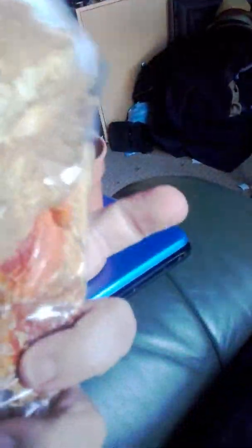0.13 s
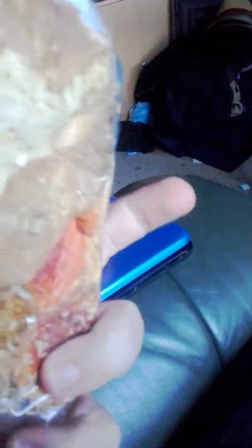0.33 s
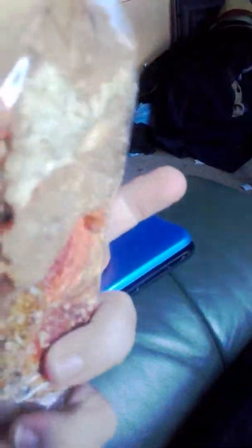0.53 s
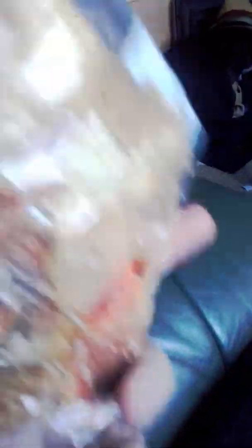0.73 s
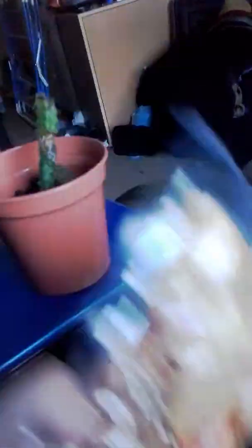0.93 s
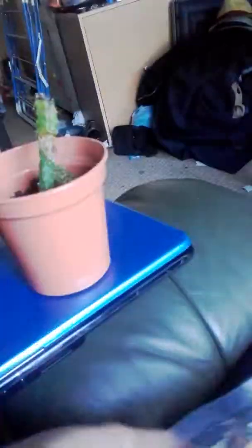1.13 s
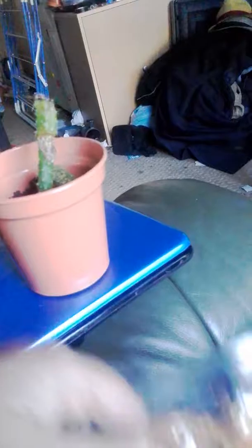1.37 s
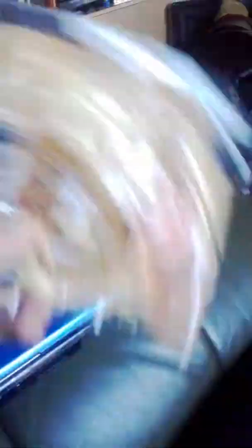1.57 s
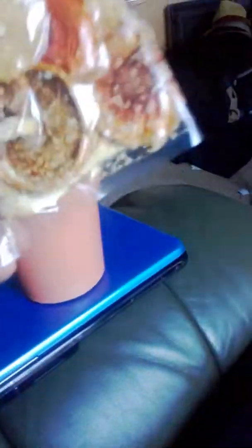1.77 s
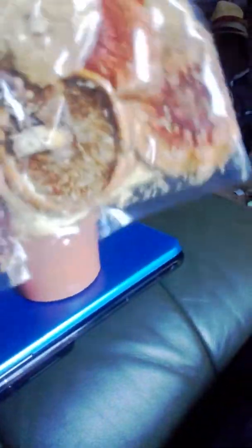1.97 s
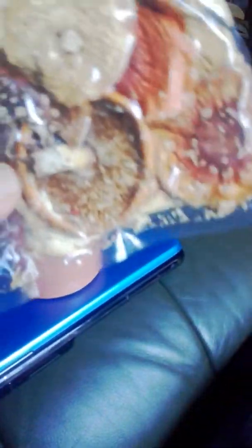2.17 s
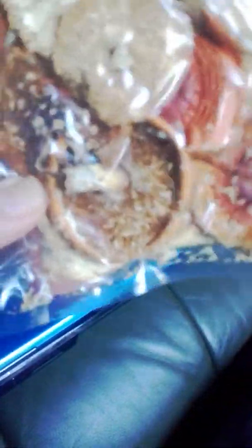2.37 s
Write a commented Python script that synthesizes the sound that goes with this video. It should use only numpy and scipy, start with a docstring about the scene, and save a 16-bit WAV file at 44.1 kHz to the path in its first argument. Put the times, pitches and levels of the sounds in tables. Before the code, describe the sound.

Crinkling plastic film snaps and rustles close up, busiest early and mid-way, then fades to near silence

```python
"""A clear plastic bag of dry food is turned over in the hands, close to a small microphone in a furnished room.
Creases buckle in sharp snaps: each is a dull flex of the film, a bright ring, a tick, a crack and a puff of
air. Between them the film slides and crumples in short strokes made of tiny clicks and small ringing crackles.
Dry pieces of food inside knock with a hollow, damped ring; the room adds echoes made of fading noise, over a
faint hiss."""
import sys
import numpy as np
from scipy import signal
from scipy.fft import rfft, irfft
from scipy.io import wavfile

SR = 44100
rng = np.random.default_rng(int(sys.argv[2]) if len(sys.argv) > 2 else 0)


def materialize(psi):
    """Save the field psi as 16-bit PCM at rate SR to the path in sys.argv[1].

    A 1-D psi becomes a single channel; in a 2-D psi each row is a channel.
    """
    bounded = np.clip(np.atleast_2d(psi).T, -1, 1)
    quanta = np.round(bounded * 32767).astype(np.int16)
    wavfile.write(sys.argv[1], SR, quanta)


N = 105840  # length in samples

# Strokes of the hand on the film; each sound made from them adds its own level offset:
# peak_s, rise_s, fall_s, body_hz, body_db, treble_hz, treble_db
HAND_STROKES = [(0.005, 0.006, 0.014, 1080, -54, 4270, -50), (0.073, 0.019, 0.023, 870, -49, 2340, -46.5),
                (0.151, 0.0058, 0.0056, 1030, -47.5, 2400, -45),
                (0.167, 0.007, 0.0082, 780, -38.5, 2270, -39.5),
                (0.284, 0.0048, 0.0061, 960, -54, 4500, -45.5), (0.314, 0.014, 0.0083, 618, -49, 3250, -47),
                (0.382, 0.015, 0.016, 636, -50.5, 3050, -44.5),
                (0.396, 0.0084, 0.017, 1070, -51.5, 2800, -47),
                (0.48, 0.0045, 0.0095, 1170, -49.5, 2200, -55.5),
                (0.496, 0.0096, 0.018, 1120, -53, 2280, -46),
                (0.528, 0.0044, 0.0093, 1130, -45.5, 2580, -44),
                (0.589, 0.014, 0.026, 930, -58.5, 3700, -59.5),
                (0.67, 0.017, 0.0088, 1730, -54.5, 2320, -49.5),
                (0.722, 0.011, 0.0084, 565, -54.5, 2500, -53),
                (0.754, 0.02, 0.037, 530, -58.5, 4830, -55.5),
                (0.872, 0.016, 0.031, 680, -58.5, 4160, -57.5),
                (0.985, 0.028, 0.028, 1100, -54.5, 2000, -56),
                (1.088, 0.0093, 0.018, 1030, -49, 3930, -48.5),
                (1.126, 0.0092, 0.045, 1240, -45.5, 4470, -43.5),
                (1.163, 0.018, 0.024, 1170, -47.5, 2250, -48),
                (1.199, 0.0052, 0.017, 640, -47.5, 1900, -45), (1.268, 0.032, 0.016, 930, -54, 4100, -51),
                (1.306, 0.0083, 0.015, 1090, -48, 2400, -53),
                (1.37, 0.015, 0.0082, 1570, -45.5, 2500, -46.5),
                (1.412, 0.019, 0.042, 1170, -50, 2110, -53), (1.478, 0.0026, 0.0071, 636, -44.5, 2310, -48),
                (1.499, 0.018, 0.0053, 1000, -51.5, 1980, -48),
                (1.529, 0.012, 0.039, 1410, -53.5, 2000, -55),
                (1.666, 0.022, 0.027, 1010, -51, 4660, -48.5),
                (1.793, 0.011, 0.0091, 1460, -55, 3270, -57.5),
                (1.851, 0.023, 0.048, 554, -72.5, 2740, -70),
                (2.119, 0.0085, 0.0042, 517, -60.5, 2460, -66),
                (2.209, 0.0056, 0.0067, 820, -59.5, 2600, -59.5),
                (2.282, 0.0035, 0.0036, 990, -60, 2800, -73)]


def undb(db):
    """Turn decibels into an amplitude factor."""
    return 10 ** (np.asarray(db) / 20)


def unit(x):
    """Scale a signal to an average (RMS) level of 1."""
    return x / np.sqrt(np.mean(x ** 2))


def read(points, hz):
    """Look up the level in a (hz, db) table, between points on a log-frequency axis."""
    p = np.array(points, float)
    return np.interp(np.log(np.maximum(hz, 1)), np.log(p[:, 0]), p[:, 1])


def colour(x, points):
    """Raise or lower each frequency of a signal by a (hz, db) table."""
    hz = np.arange(len(x) // 2 + 1) * SR / len(x)
    return irfft(rfft(x) * undb(read(points, hz)), len(x))


def fade(t, t60):
    """Die away by 60 dB in t60 seconds."""
    return np.exp(-np.log(1000) * t / t60)


def band(x, lo, hi, order=2):
    """Keep the frequencies between lo and hi, in Hz."""
    sos = signal.butter(order, [lo, min(hi, SR / 2 - 1)], "band", fs=SR, output="sos")
    return signal.sosfilt(sos, x)


def blip(hz, t60):
    """A short damped ring whose energy equals 1 ms at full level."""
    t = np.arange(SR // 25) / SR
    ring = np.sin(2 * np.pi * hz * t) * fade(t, t60) * (1 - np.exp(-2 * hz * t))
    return ring * np.sqrt(SR / 1000 / np.sum(ring ** 2))


def add(out, at, sound):
    """Mix a short sound in at a time in seconds."""
    i = int(at * SR)
    out[i:i + len(sound)] += sound[:len(out[i:i + len(sound)])]


def background_hiss():
    """Faint steady hiss: random noise with its own colour."""
    # Shape of the hiss before its overall level is set: pitch_hz, level_db (per Hz)
    hiss_colour = [(20, -15), (55, -19.5), (130, -17.5), (230, -12), (380, -15.5), (520, -7), (700, -15),
                   (1050, -13.5), (2000, -17), (5400, -29.5), (15000, -23.5)]
    level_db = -66
    return undb(level_db) * unit(colour(rng.standard_normal(N), hiss_colour))


def room(x):
    """Quick reflections from the bag, hands and furniture, then the soft, duller tail of the room."""
    # Colour of the echoes before their overall level and damping: pitch_hz, level_db
    echo_colour = [(60, -13), (200, 7), (500, 0.5), (1100, -2), (2000, -2.5), (4500, -6.5), (8000, 4.5),
                   (16000, 6)]
    near_db, near_t60_s, near_delay_s = -13, 0.15, 0.0016
    tail_db, tail_t60_s = -14.5, 0.68
    damp_hz, damp_t60_s = 5800, 0.27  # furnishings soak up the highest treble sooner
    blur_hz = 89.3  # typical pitch wander: the echoes are diffuse and hold no clear pitch
    t = np.arange(SR // 2) / SR

    def echoes(t60, db):
        """Fading coloured noise, with an extra fade on its treble."""
        start = np.clip(t / near_delay_s - .5, 0, 1)
        noise = colour(rng.standard_normal(len(t)), echo_colour) * fade(t, t60) * start
        low = signal.sosfiltfilt(signal.butter(6, damp_hz, fs=SR, output="sos"), noise)
        damped = low + (noise - low) * fade(t, damp_t60_s)
        return damped * undb(db) / np.sqrt(np.sum(fade(t, t60) ** 2))

    # Shift all pitches of the sound up and down at random before it echoes.
    wander_hz = blur_hz * unit(band(rng.standard_normal(N), blur_hz / 2, blur_hz))
    turning = np.exp(2j * np.pi * np.cumsum(wander_hz) / SR)
    blurred = np.real(signal.hilbert(x) * turning)
    all_echoes = echoes(near_t60_s, near_db) + echoes(tail_t60_s, tail_db)
    return x + signal.fftconvolve(blurred, all_echoes)[:N]


def knocks():
    """Dry pieces of food inside the bag knock with a hollow ring and a weaker upper mode."""
    # Hollow knocks, level as energy spread over 1 ms: start_s, pitch_hz, level_db (of the lower mode)
    piece_knocks = [(0.162, 750, -37), (0.3725, 624, -41), (1.2955, 990, -39), (1.308, 1133, -36),
                    (1.391, 960, -40), (1.407, 1240, -41), (1.478, 760, -37.5), (2.281, 1000, -52)]
    t60_s, upper_ratio, upper_db = 0.018, 1.8, -11  # upper mode relative to the lower one
    out = np.zeros(N)
    for at, hz, db in piece_knocks:
        lower = blip(hz, t60_s)
        upper = undb(upper_db) * blip(hz * upper_ratio, t60_s / 2)
        add(out, at, undb(db) * (lower + upper))
    return out


def crackles():
    """Small wrinkles give way all through each stroke, each at its own pitch and strength."""
    slots_per_s, cycles = 220, 9  # one crackle a slot; each fades by 60 dB in this many cycles
    base_db, spread_db = -3, 10.5  # relative to the stroke; the spread is the most a crackle gains
    bright_hz, pitch_octaves = 4400, 1.55  # pull on the treble pitch; full width of the pitch spread
    out = np.zeros(N)
    for at, rise, fall, body_hz, body_db, treble_hz, treble_db in HAND_STROKES:
        chance = rng.random((64, 4))
        for k, (when, kind, pitch, size) in enumerate(chance):
            offset = (k + when) / slots_per_s - 2 * rise  # seconds from the stroke's peak
            if offset > 2 * fall or at + offset < 0:
                continue
            if kind < .5:
                hz, db = body_hz, body_db
            else:
                hz, db = np.sqrt(treble_hz * bright_hz), treble_db
            hz = hz * 2 ** (pitch_octaves * (pitch - .5))
            swell = np.exp(-.5 * (offset / (rise if offset < 0 else fall)) ** 2)
            level = swell * undb(db + base_db + spread_db * size ** 2)
            add(out, at + offset, level * blip(hz, cycles / hz))
    return out


def rustle():
    """Strokes swell and ebb as a shower of tiny clicks, which also ring two resonances of the fold under the hand."""
    # Colour relative to the stroke's level, before the rustle's overall level:
    # pitch_hz, level_db (per half octave)
    rustle_colour = [(100, -41), (200, -22), (400, -13.5), (700, -8), (1100, -6), (1600, -8.5), (2400, -4),
                     (3300, -5.5), (4600, -5.5), (6400, -13), (9000, -16.5), (15000, -24)]
    # Added level of the top treble, brighter while the bag is swung round: time_s, level_db
    sheen = [(.15, 1), (1.05, 2.5), (1.12, 1), (1.55, 6), (1.68, 2)]
    sheen_hz = 6000  # the sheen acts on bands centred above this
    rustle_db = -3
    clicks_per_s, click_spread_db, click_colour_db = 3500, 3, 4.5
    body_centre_hz, treble_centre_hz = 1400, 2800
    # Fold resonances relative to the stroke; width as a share of the pitch
    fold_body_db, fold_treble_db, fold_width = -4.5, -4, 0.12
    t = np.arange(N) / SR

    strength_db = click_spread_db * np.minimum(rng.exponential(1, N), 4)
    clicks = (rng.random(N) < clicks_per_s / SR) * undb(strength_db)
    shower = unit(clicks * rng.choice([-1, 1], N))

    out, body, treble = 0, 1e-14, 1e-14  # body and treble gather the power of the strokes
    for at, rise, fall, body_hz, body_db, treble_hz, treble_db in HAND_STROKES:
        distance = (t - at) / np.where(t < at, rise, fall)
        power = np.exp(-np.minimum(distance ** 2, 20))
        body = body + power * undb(body_db) ** 2
        treble = treble + power * undb(treble_db) ** 2
        for hz, db in (body_hz, body_db + fold_body_db), (treble_hz, treble_db + fold_treble_db):
            fold = unit(band(shower, hz / (1 + fold_width), hz * (1 + fold_width)))
            out = out + np.sqrt(power) * undb(db) * fold

    for hz in 100 * 2 ** (np.arange(15) / 2):  # half-octave bands
        # Low bands follow the body of the strokes, high bands follow their treble.
        bright = np.clip(np.log(hz / body_centre_hz) / np.log(treble_centre_hz / body_centre_hz), 0, 1)
        click_gain = undb(click_colour_db * rng.uniform(-1.4, 1, N))
        own_clicks = unit(clicks * rng.choice([-1, 1], N) * click_gain)
        lo, hi = hz / 2 ** .25, hz * 2 ** .25
        stroke_power = body ** (1 - bright) * treble ** bright
        # Make up for the narrow share of the clicks' energy that the band lets through.
        drive = own_clicks * np.sqrt(stroke_power * SR / 2 / (hi - lo))
        sheen_db = np.interp(t, *np.array(sheen).T) * (hz > sheen_hz)
        out = out + undb(read(rustle_colour, hz) + sheen_db) * band(drive, lo, hi, order=3)
    return undb(rustle_db) * out


def snaps():
    """Each crease pops through: the film cracks, flexes for a few cycles, pushes a puff of air, rings and ticks."""
    # Buckling creases; levels are energies spread over 1 ms, before the offsets below:
    # start_s, flex_hz, flex_db, ring_hz, ring_db, tick_db
    creases = [(0.07, 1080, -39, 4470, -35.5, -67), (0.093, 1750, -56, 4630, -41, -65),
               (0.1714, 1310, -36, 3370, -34, -41), (0.1839, 1850, -30, 3310, -18.5, -46),
               (0.1859, 620, -24, 4100, -23.5, -30), (0.1875, 1100, -31, 2900, -21.5, -53),
               (0.1901, 1050, -20.5, 2520, -24.5, -44), (0.191, 1065, -22.5, 2500, -20.5, -47),
               (0.2826, 2060, -41, 4740, -42.5, -68), (0.3618, 2130, -61, 4370, -37.5, -63),
               (0.381, 700, -37, 4580, -41.5, -58), (0.5117, 1610, -34.5, 4160, -37.5, -48),
               (0.5249, 1820, -34.5, 3670, -44, -71), (0.5294, 2020, -33.5, 2500, -35, -63),
               (0.701, 1950, -35, 4600, -27, -40), (0.8539, 1120, -38.5, 2870, -37, -74),
               (0.9546, 1660, -56, 4660, -43.5, -70), (0.9597, 2150, -50, 2740, -42, -69),
               (0.9776, 1330, -44.5, 3970, -41.5, -71.5), (1.006, 1330, -50, 4100, -44.5, -49),
               (1.0124, 1400, -48, 4750, -44, -53.5), (1.0761, 760, -35.5, 4210, -24, -44),
               (1.0773, 2400, -40, 5000, -30.5, -60.5), (1.1155, 1350, -24, 2720, -64, -62),
               (1.121, 1300, -26.5, 3680, -37, -47), (1.1231, 1170, -40, 4400, -25, -36.5),
               (1.127, 1288, -24.5, 4120, -31, -58), (1.1313, 1370, -27.5, 4120, -37, -60),
               (1.1471, 1320, -24, 4670, -24.5, -38), (1.1736, 1290, -25, 2840, -30, -46),
               (1.2001, 1300, -32.5, 4600, -39, -38), (1.2327, 1400, -24, 4700, -37, -40),
               (1.243, 1540, -31, 4550, -38, -59), (1.2517, 980, -24, 3140, -50, -69),
               (1.2553, 1510, -23.5, 4310, -20, -33), (1.2599, 1960, -28.5, 4530, -32.5, -57),
               (1.2716, 1170, -42, 5420, -41, -54), (1.3284, 1290, -38, 4500, -29, -47),
               (1.3402, 1860, -25.5, 4400, -23.5, -39), (1.344, 1290, -43, 4690, -43, -65),
               (1.369, 1610, -34, 2800, -42, -62), (1.395, 1600, -30, 4550, -35.5, -69),
               (1.455, 1450, -36, 3980, -34, -63), (1.5063, 1370, -39, 4530, -33.5, -52),
               (1.6161, 1880, -39.5, 2900, -38, -53), (1.6414, 1770, -33, 4300, -33, -64),
               (1.7713, 2600, -49, 3900, -39, -67), (1.7746, 1530, -55, 2900, -39, -59),
               (1.786, 2650, -36.5, 4900, -37, -49), (2.208, 1190, -53, 3200, -49, -56.5)]
    flex_t60_s, ring_t60_s, tick_t60_s, puff_t60_s = 0.0065, 0.0035, 0.0034, 0.007
    flex_offset_db, ring_offset_db, tick_offset_db = -1, -1, -4.5
    crack_offset_db = -3  # the instant of buckling, relative to the table's tick level
    puff_offset_db, puff_centre_hz = -17.5, 501  # relative to the table's flex level, at a 1000 Hz flex
    tick_low_hz, ring_top_hz, crack_top_hz = 6000, 7500, 11000
    rise_s, roughness = 0.00017, 0.46  # roughness is the noise mixed into each flex and ring

    t = np.arange(SR // 40) / SR
    out = np.zeros(N + len(t))
    one_ms = SR / 1000  # in samples
    rise = 1 - np.exp(-t / rise_s)

    def sized(sound, db):
        """Give a sound the energy of 1 ms at this level."""
        return sound * undb(db) * np.sqrt(one_ms / np.sum(sound ** 2))

    def rough_wave(hz, noise):
        """A pure tone plus noise around its pitch."""
        return np.sin(2 * np.pi * hz * t) + roughness * unit(band(noise, hz * 0.32, hz * 1.49))

    crack = band(1. * (t == 0), 2000, crack_top_hz, order=1)  # a single click
    for at, flex_hz, flex_db, ring_hz, ring_db, tick_db in creases:
        noise = rng.standard_normal((4, len(t)))
        flex = rise * fade(t, flex_t60_s) * rough_wave(flex_hz, noise[0])
        flex = band(flex, 330, ring_top_hz)
        ring = rise * fade(t, ring_t60_s) * rough_wave(ring_hz, noise[1])
        ring = band(ring, 510, ring_top_hz, order=3)
        tick = band(rise * noise[2] * fade(t, tick_t60_s), tick_low_hz, 9000, order=1)
        puff = band(noise[3] * fade(t, puff_t60_s), puff_centre_hz / 2, puff_centre_hz * 3.0)
        # Wider, lower panels push more air.
        puff_db = flex_db + puff_offset_db - 5 * np.log2(flex_hz / 1000)
        snap = sized(flex, flex_db + flex_offset_db) + sized(puff, puff_db)
        snap += sized(ring, ring_db + ring_offset_db)
        snap += sized(tick, tick_db + tick_offset_db) + sized(crack, tick_db + crack_offset_db)
        add(out, at, snap)
    return out[:N]


def scene():
    """The bag in the room, with its lowest sound cut, over faint hiss."""
    hiss = background_hiss()
    film = snaps() + knocks() + crackles() + rustle()
    low_cut = signal.butter(4, 148, "high", fs=SR, output="sos")  # Hz
    bag = signal.sosfilt(low_cut, room(film))
    return (bag + hiss)[None]


def record(dry):
    """The microphone colours the sound; the recorder adds a tiny steady offset and cuts the top."""
    # Colour of the small microphone: pitch_hz, level_db
    mic_colour = [(300, -2), (620, -0.5), (1150, -0.5), (1800, -2), (2500, 1), (3400, -1.5), (4200, 3),
                  (5000, 2), (5900, 1), (8000, 0.5), (12000, -2), (16000, -4.5)]
    top_hz, offset = 16000, -0.00044  # offset as a share of full scale
    top_cut = signal.ellip(8, .2, 70, top_hz, fs=SR, output="sos")
    return signal.sosfilt(top_cut, colour(dry[0], mic_colour))[None] + offset


dry = scene()
out = record(dry)
materialize(out)
```